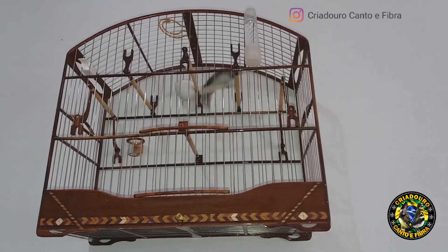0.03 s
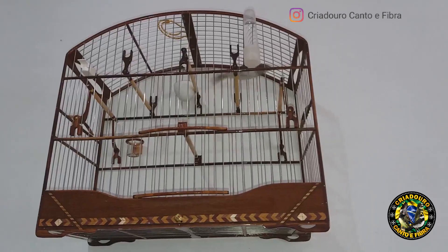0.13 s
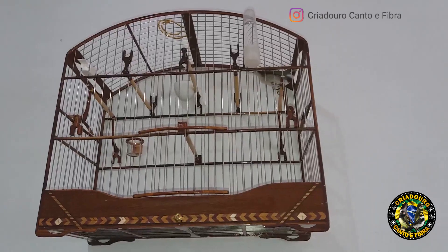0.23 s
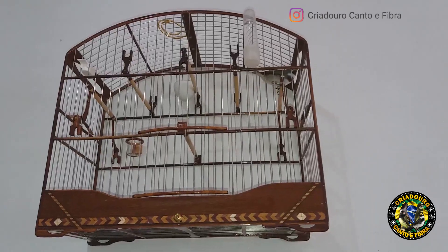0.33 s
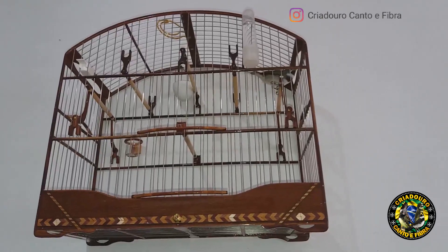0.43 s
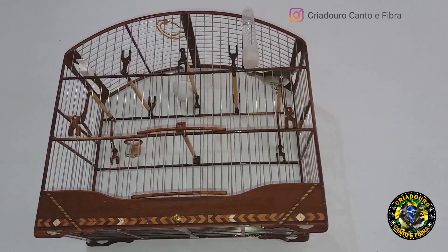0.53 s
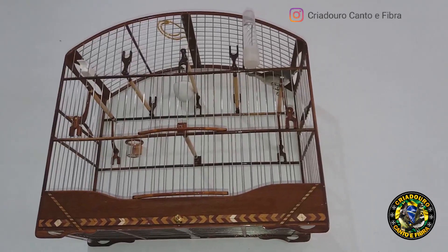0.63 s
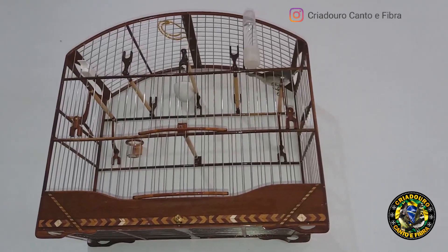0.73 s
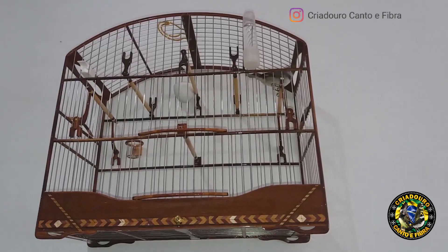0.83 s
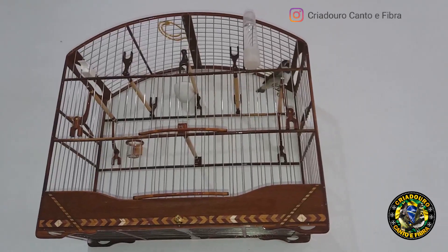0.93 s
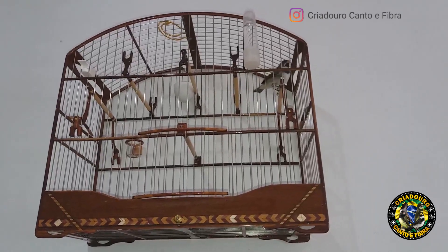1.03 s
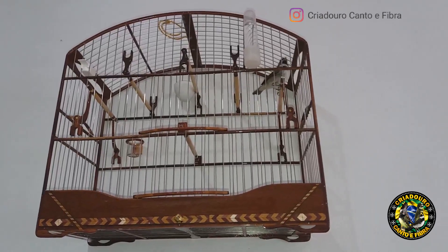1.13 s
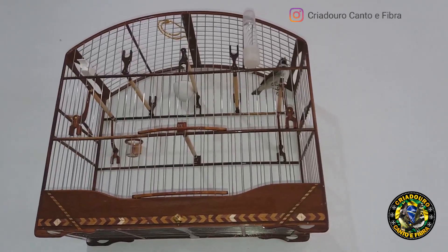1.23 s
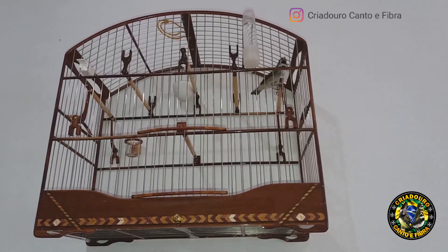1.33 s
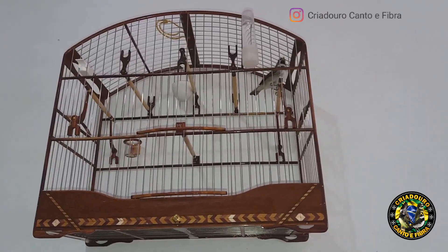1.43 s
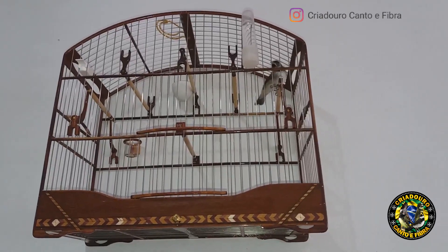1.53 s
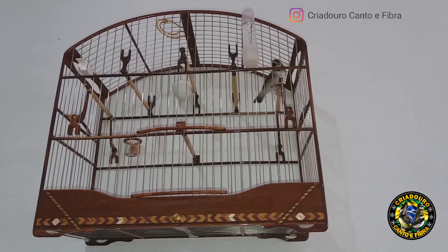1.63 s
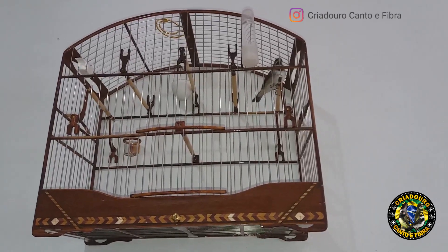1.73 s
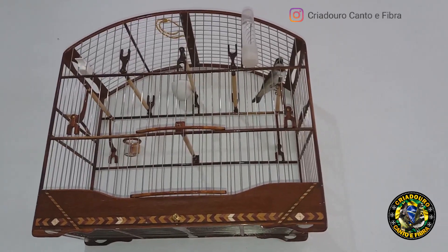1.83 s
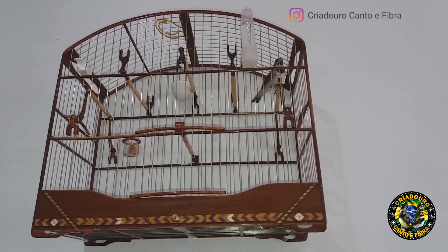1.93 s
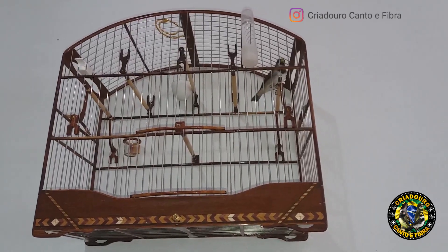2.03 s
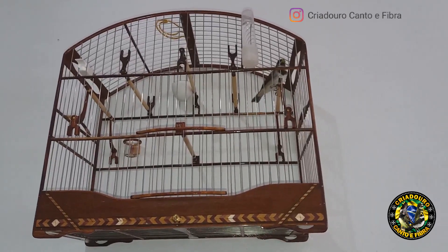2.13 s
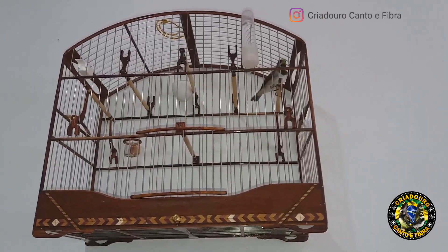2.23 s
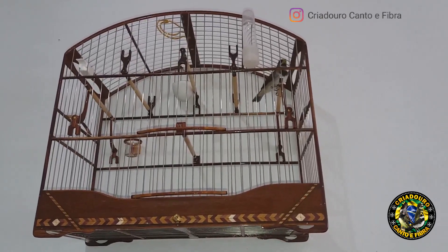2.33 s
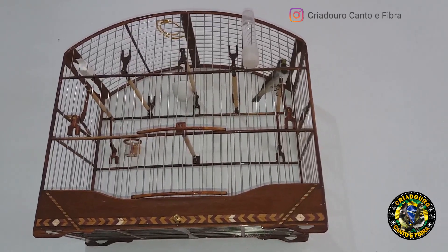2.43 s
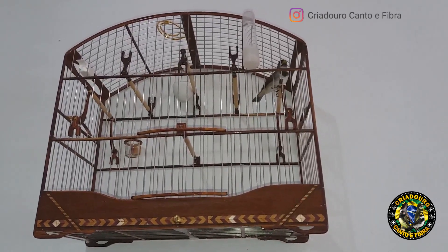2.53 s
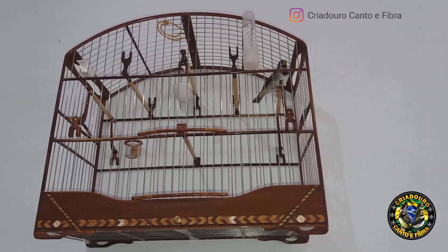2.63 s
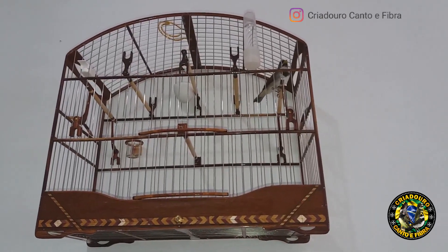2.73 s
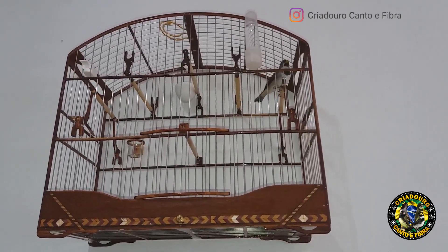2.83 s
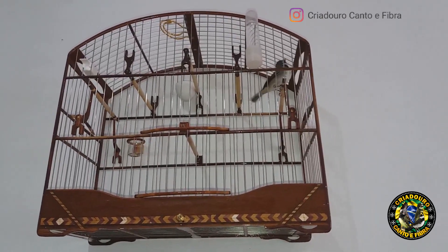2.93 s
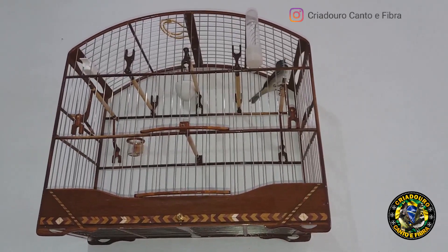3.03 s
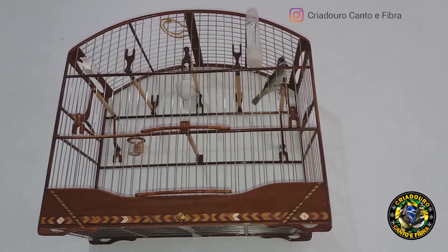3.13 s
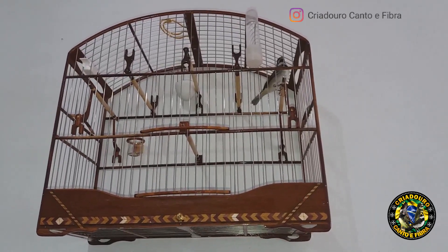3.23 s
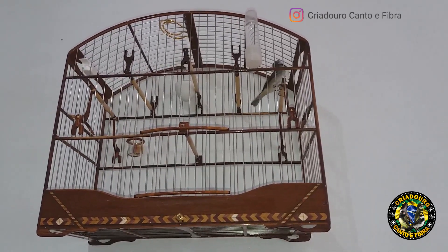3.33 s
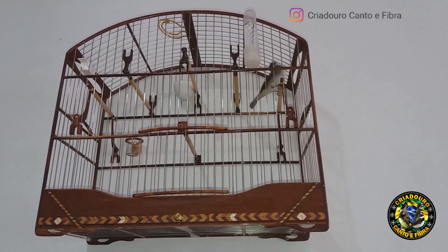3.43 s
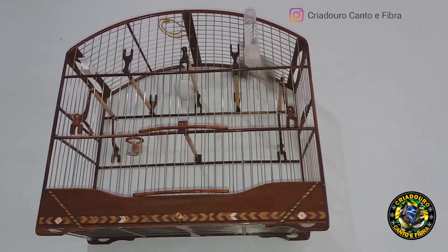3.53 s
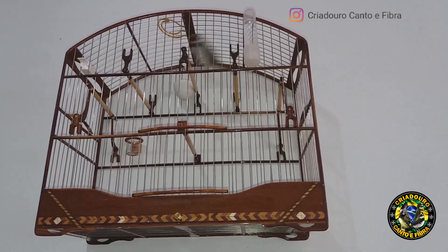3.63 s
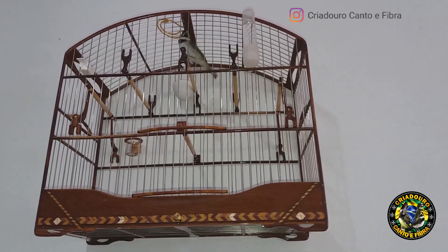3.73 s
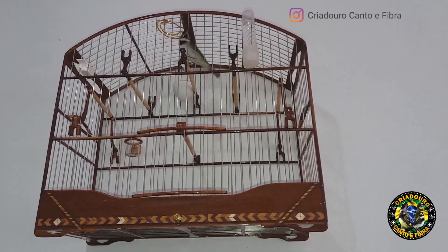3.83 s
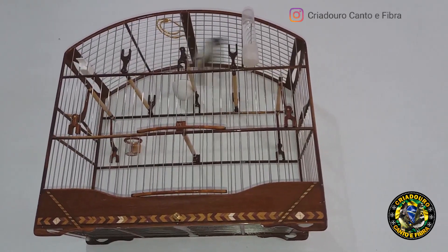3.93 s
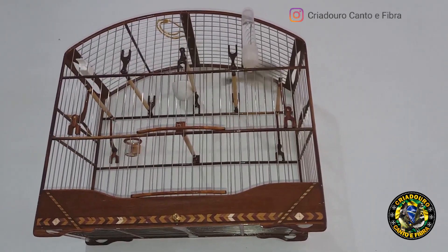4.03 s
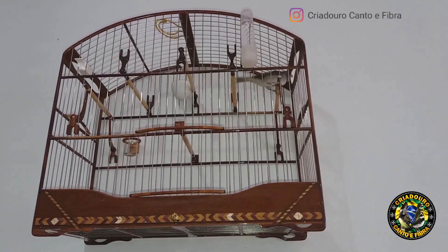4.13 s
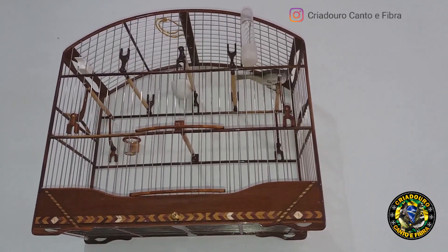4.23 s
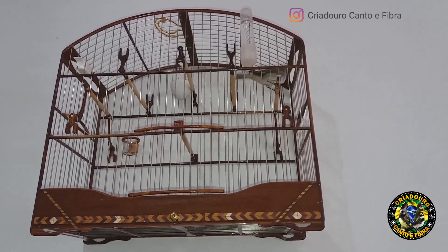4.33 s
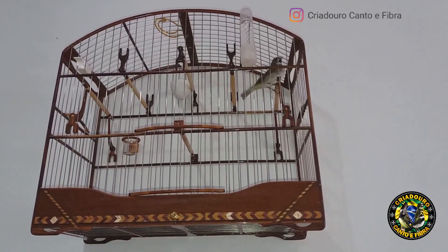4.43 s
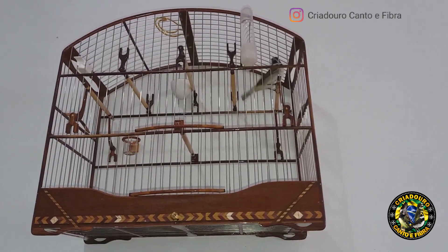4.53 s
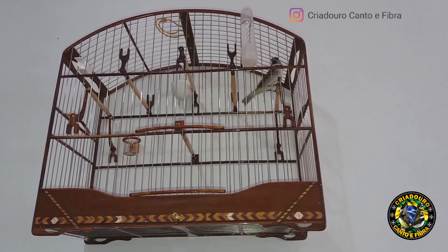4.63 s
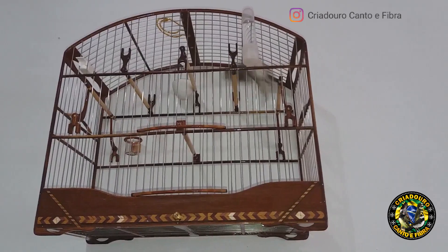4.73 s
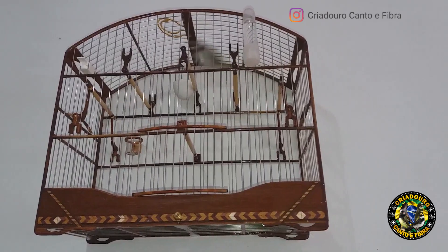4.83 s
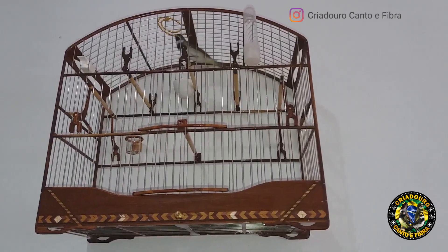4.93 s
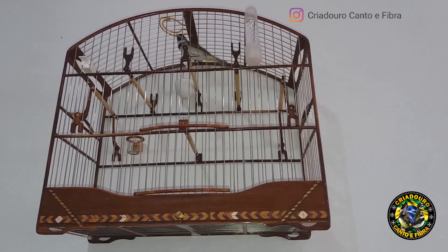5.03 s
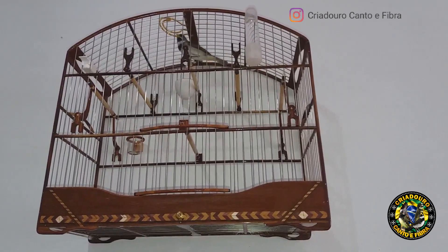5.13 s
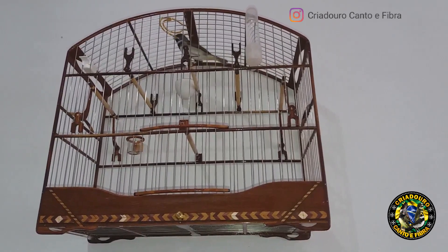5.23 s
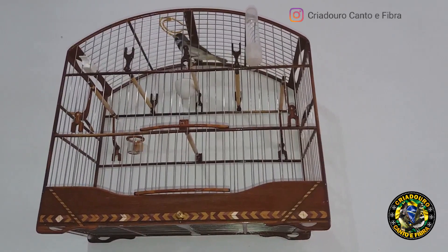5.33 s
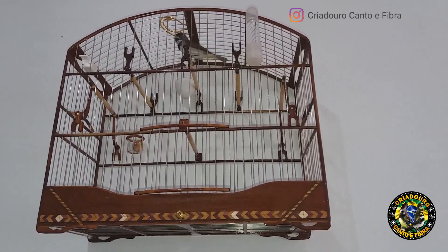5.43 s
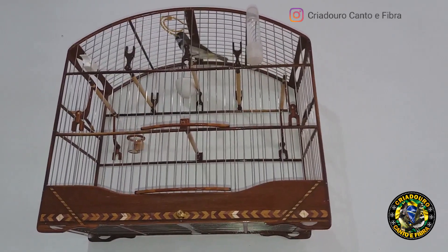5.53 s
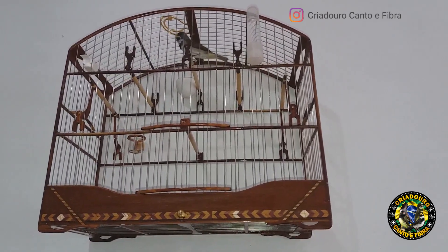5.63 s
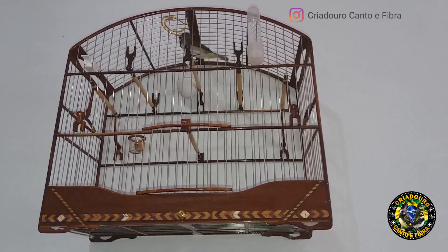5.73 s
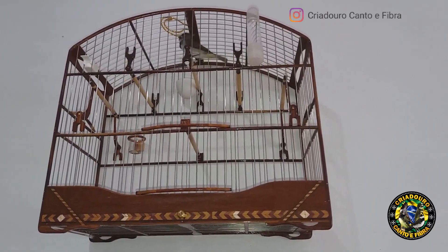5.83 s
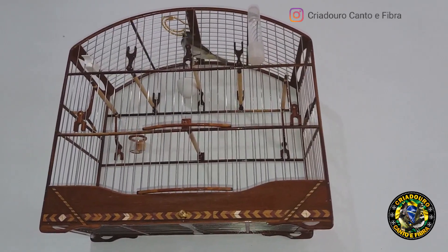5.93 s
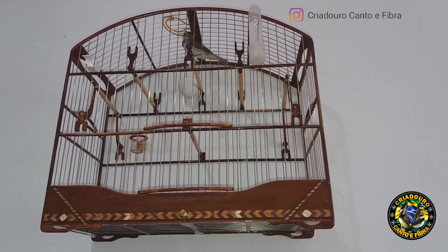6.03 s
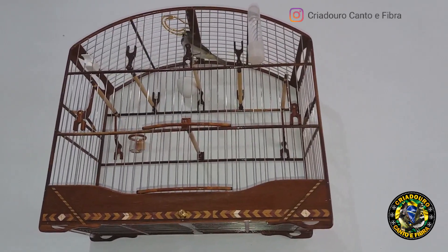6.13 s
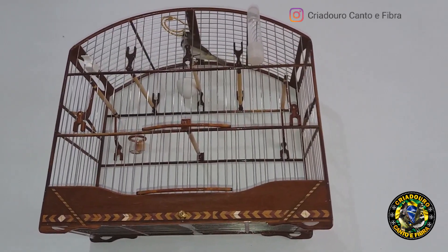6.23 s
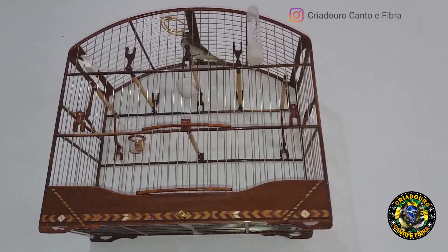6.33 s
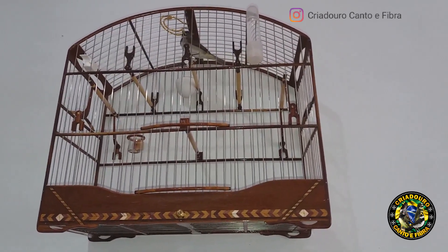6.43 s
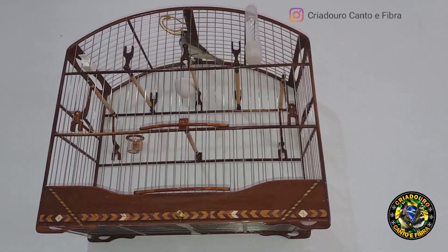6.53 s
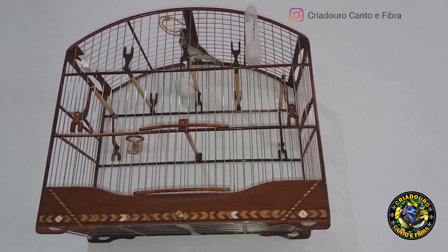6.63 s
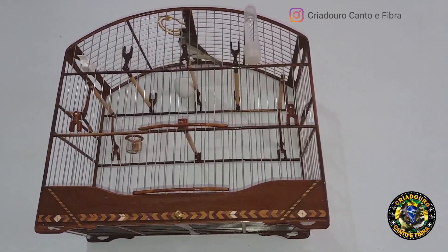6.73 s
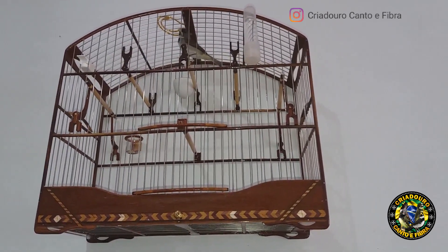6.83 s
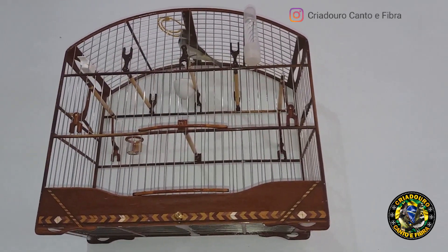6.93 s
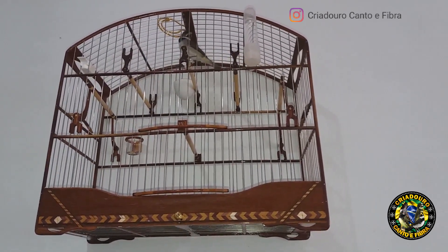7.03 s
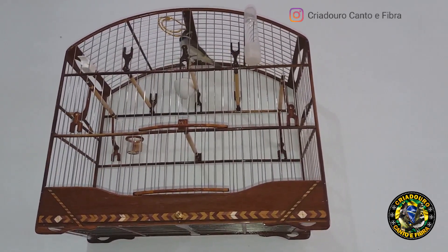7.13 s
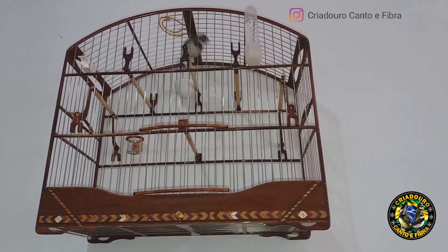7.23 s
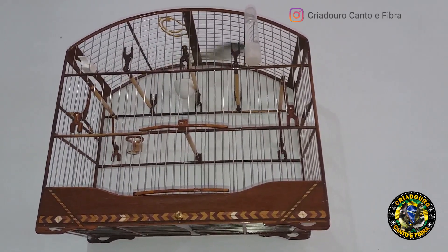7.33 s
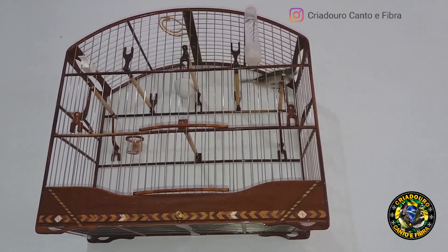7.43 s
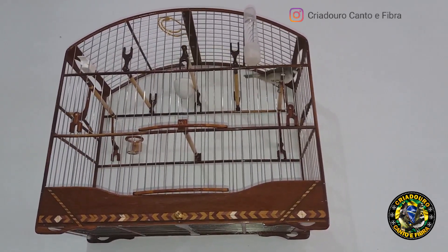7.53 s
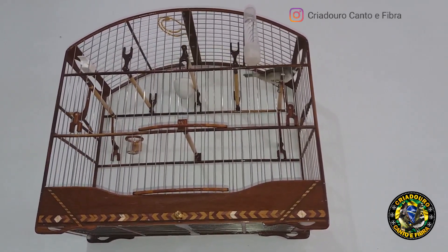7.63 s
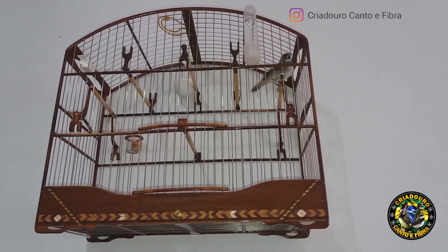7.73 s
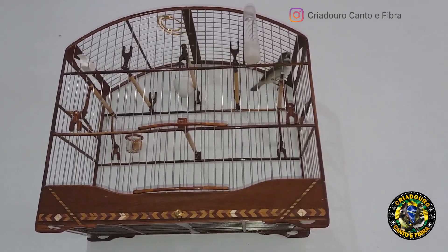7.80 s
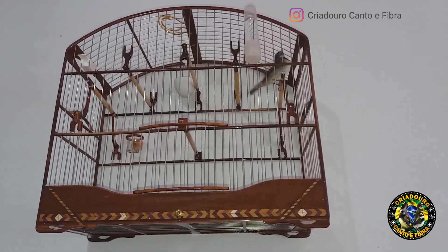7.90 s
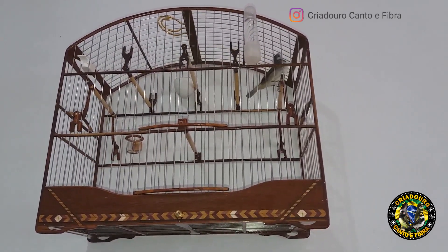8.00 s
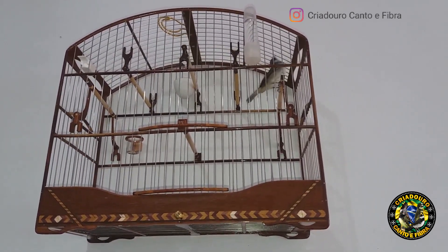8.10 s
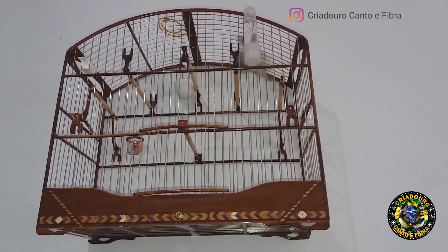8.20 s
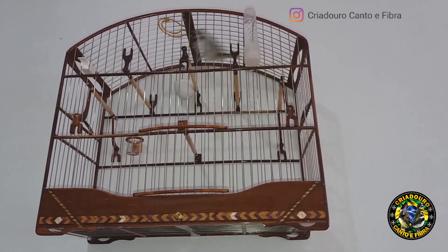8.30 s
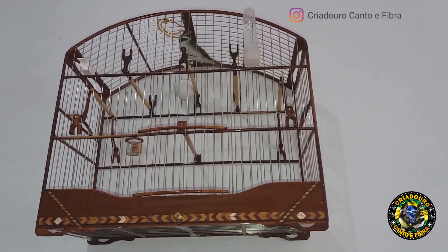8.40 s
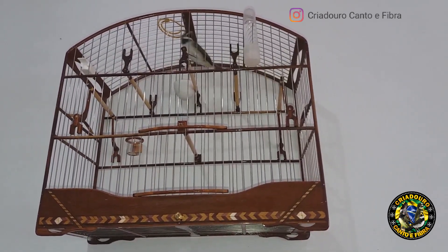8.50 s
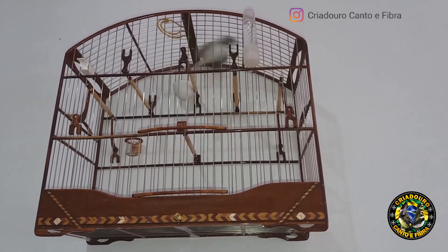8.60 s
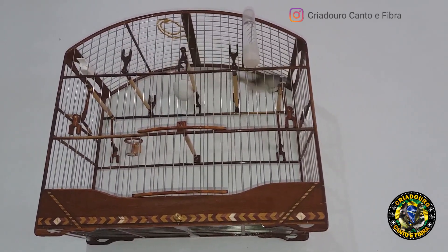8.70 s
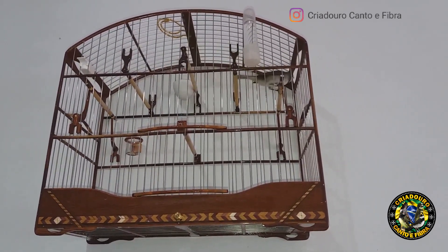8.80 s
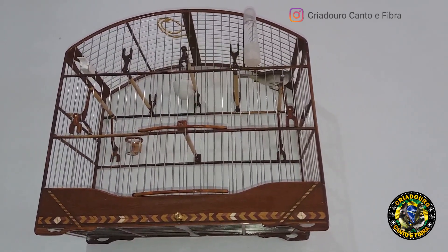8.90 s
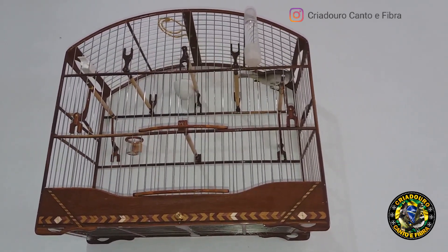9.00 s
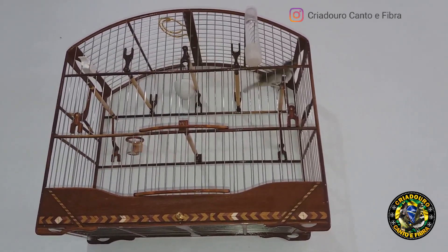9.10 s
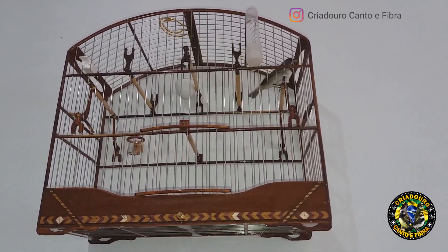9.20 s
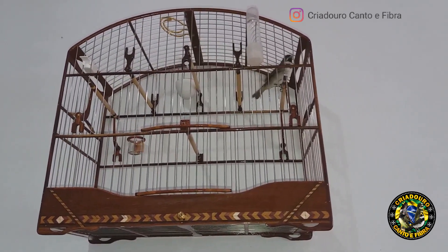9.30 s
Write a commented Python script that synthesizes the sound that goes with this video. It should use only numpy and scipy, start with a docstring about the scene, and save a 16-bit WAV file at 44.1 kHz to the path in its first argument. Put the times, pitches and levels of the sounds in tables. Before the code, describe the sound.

Over a quiet fan hum and airy hiss in a bare room, a nearby caged finch sings twice, each phrase about a second long: a thin whistle, two rising trills, then sharp downward sweeps carrying soft low pops. Before, between and after the songs come faint claw ticks and wooden perch knocks, occasionally with a thin wire ring. Distant birds give faint, hoarse chirps near the start and end.

```python
"""A bare, echoing room, the microphone near a small caged finch. The bird sings two phrases with its
syrinx: a whistle led in by a hiss of air, trilled rises, steep falls. Low pops ride on the falls.
Between songs it hops: claws tick, the wooden perch knocks, now and then a wire rings.
Other birds call faintly from further off, and a fan hums behind it all."""
import sys
import numpy as np
from scipy import signal
from scipy.fft import rfft, irfft
from scipy.io import wavfile
from scipy.ndimage import uniform_filter1d, minimum_filter1d

SR = 44100
rng = np.random.default_rng(int(sys.argv[2]) if len(sys.argv) > 2 else 0)


def unload_audio(sound):
    """Save the sound as a 16-bit wav file, at the path given as the first command line argument."""
    columns = np.transpose(np.atleast_2d(sound))
    # keep every value between -1 and 1, then stretch to whole-number steps
    steps = np.round(np.clip(columns, -1, 1) * 32767)
    wavfile.write(sys.argv[1], SR, steps.astype(np.int16))


N = 412776

# The notes of each syllable. Each row: note shape, offset in seconds, length in seconds,
# pitch as a multiple of the syllable's, level in dB against the syllable's.
SYLLABLE_NOTES = { "opening": [("whistle", 0, .073, 0.99, 0)], "slur": [("trill", -.06, .06, 0.74, -9),
                  ("rise", 0, .093, 1.0, 0)], "sweep": [("fall", 0, 0.06, 0.99, 0),
                  ("flick", .058, 0.014, 0.6643, 4.6), ("dip", .077, .053, .524, -6)], }
# The song, by syllable. Each row: time in seconds, pitch in Hz, level in dB,
# seconds by which the flick starts early, seconds by which it ends late.
SONG = { "opening": [(1.733, 4823, -3.5, 0, 0), (5.19, 4707, -6.5, 0, 0)],
        "slur": [(1.998, 4382, -3.5, 0, 0), (2.215, 4287, -3.5, 0, 0), (5.448, 4413, -4.5, 0, 0),
        (5.68, 4237, -2.5, 0, 0), (5.905, 4285, -4, 0, 0)], "sweep": [(2.36, 7340, -7, 0.0027, 0.0013),
        (2.53, 7336, -8, 0.001, 0.0055), (2.722, 7350, -9, 0.0013, 0.0011), (6.039, 7346, -6, .002, 0.011),
        (6.211, 7214, -5.5, 0.0071, 0.00084)], }


def finch_song():
    """The finch, near the microphone, strings notes into syllables; a hiss leads into each phrase."""
    out = np.zeros(N)
    for syllable, rows in SONG.items():
        for s, hz, db, early_s, late_s in rows:
            if syllable == "opening":
                add(out, s + .01 - BREATH_S, breath(db))
            for kind, offset_s, length, pitch, note_db in SYLLABLE_NOTES[syllable]:
                if kind == "flick":
                    offset_s, length = offset_s - early_s, length + early_s + late_s
                add(out, s + offset_s, note(kind, length, hz * pitch, db + note_db))
    return out


# The course of each kind of note. Each row: share of its length from 0 to 1,
# pitch as a multiple of the note's, level in dB against the note's.
NOTE_SHAPES = { "whistle": [(0, .84, -34.5), (.15, .92, -18.5), (.4, .975, -9), (.65, 1.0, 3.5),
               (.88, 1.0, -2), (1, .95, -24.5)], "trill": [(0, .86, -21), (.2, .93, -11), (.5, .96, -4.5),
               (.8, .99, -4.5), (1, 1.03, -3.5)], "rise": [(0, .81, -13), (.2, .85, -6), (.4, .935, -1.5),
               (.6, .98, -4), (.85, 1.0, 0.5), (1, 1.0, -9)], "fall": [(0, 1.01, -24), (.15, .97, -3),
               (.36, .9, 2.5), (.55, .8, -3.5), (.75, .74, -6.5), (.9, .72, -8.5), (1, .705, -14.5)],
               "flick": [(0, .86, -11), (.3, .94, -8), (.65, .99, 0), (1, 1.0, -5)], "dip": [(0, .93, -8),
               (.17, 1.0, 1.5), (.4, .89, -2.5), (.62, .76, -7.5), (.85, .72, -11), (1, .69, -18)], }
# Unsteadiness within a note. Each entry: kind of note, rms waver of its level in dB.
LEVEL_WAVER_DB = {"whistle": .3, "trill": 2.8, "rise": 2.5, "fall": 3.5, "flick": 1.0, "dip": 3.0}
TRILL_HZ, TRILL_SWING, TRILL_JITTER = 160.4, 0.1, .2  # pulse rate, share of the pitch, rms cycles


def note(kind, length, hz, db):
    """One gliding note; in a trill the valve opens in uneven pulses and the pitch swings with it."""
    at, pitch, shape_db = np.transpose(NOTE_SHAPES[kind])
    share = np.linspace(0, 1, int(length * SR))
    valve = undb(LEVEL_WAVER_DB[kind] * smooth_noise(len(share), 160))
    glide = hz * uniform_filter1d(np.interp(share, at, pitch), size=100, mode="nearest")
    if kind == "trill":
        jitter = TRILL_JITTER * smooth_noise(len(share), 60)
        beat = 2 * np.pi * (TRILL_HZ * length * (share - 1) + jitter)
        glide = glide * (1 - TRILL_SWING * np.cos(beat - .5))  # highest near the widest opening
        valve = valve * (0.56 + (.5 - .5 * np.cos(beat)) ** 4.2)
    gain = undb(db + np.interp(share, at, shape_db))
    return syrinx(glide, gain, kind, valve)


# Overtones, by kind of note. Each row: levels of the second, third and fourth harmonics in dB.
OVERTONES_DB = {"whistle": (-41, -44.5, -71), "trill": (-18, -32, -32), "rise": (-40, -36.5, -44.5),
                "fall": (-25, -56, -60), "flick": (-31.5, -27.5, -54.5), "dip": (-33, -39, -32.5)}
# Roughness of the overtones. Each entry: kind of note, share of turbulence from 0 to 1.
TURBULENCE = {"whistle": .08, "trill": .5, "rise": .2, "fall": .6, "flick": .6, "dip": .7}
RASP_HZ, PITCH_WOBBLE = 500, .0025  # top rate of the flutter, share of the pitch


def syrinx(hz, gain, kind, valve=1):
    """A bird's voice: a slightly unsteady sine, faint overtones that turbulence smears, soft ends."""
    count, rasp = len(hz), TURBULENCE[kind]
    unsteady_hz = hz * (1 + PITCH_WOBBLE * smooth_noise(count, 91))
    phase = 2 * np.pi * np.cumsum(unsteady_hz) / SR
    wave = valve * np.sin(phase)
    for k, db in zip((2, 3, 4), OVERTONES_DB[kind]):
        flutter = 1 - rasp + rasp * smooth_noise(count, RASP_HZ)
        in_band = k * hz < .45 * SR
        wave += undb(db) * in_band * valve ** 0.095 * flutter * np.sin(k * phase)
    n = np.arange(count)
    fade = np.clip(np.minimum(n, n[::-1]) / (.003 * SR), 0, 1)  # 3 ms at each end
    return wave * gain * fade


BREATH_S, BREATH_HZ, BREATH_WIDTH_HZ = .045, 4815, 3200


def breath(syllable_db):
    """Air escapes before the voice sets in, swelling towards the note."""
    hiss = resonance(rng.standard_normal(int(BREATH_S * SR)), BREATH_HZ, BREATH_WIDTH_HZ)
    return undb(syllable_db - 48) * unit(hiss) * np.linspace(0, 1, len(hiss))


# Pops on the steep falls. Each row: start in seconds, crackle level in dB, thump level in dB.
LOW_POPS = [(2.379, -22, -32), (2.385, -29, -44), (2.428, -29.5, -23), (2.559, -29, -21.5),
            (2.574, -33.5, -36), (2.58, -31.5, -44), (2.741, -35, -42.5), (2.752, -30.5, -45.5),
            (2.761, -35.5, -43), (2.792, -34.5, -39), (6.059, -25.5, -20), (6.069, -27.5, -18.5),
            (6.229, -26.5, -22)]


def pops(crackle_rise_s=.001, thump_rise_s=.00078, cutoff_hz=1090):
    """Short, dull crackles over a soft thump, with none of the room's echo on them."""
    out, t = np.zeros(N), np.arange(SR // 20) / SR
    lowpass = signal.butter(2, cutoff_hz, fs=SR)
    thump = t / thump_rise_s * np.exp(1 - t / thump_rise_s)
    burst = t / crackle_rise_s * np.exp(1 - t / crackle_rise_s)
    for s, crackle_db, thump_db in LOW_POPS:
        crackle = burst * unit(signal.lfilter(*lowpass, rng.standard_normal(len(t))))
        add(out, s, undb(crackle_db) * crackle + undb(thump_db) * thump)
    return out


# The wooden perch's modes. Each row: frequency in Hz, relative level in dB, seconds to fall 60 dB.
PERCH_MODES = [(2375, 1.5, 0.035), (3320, 0.5, .02), (5054, -2.5, 0.013)]
# Feet landing on perch and wires. Each row: start in seconds, tick level in dB, tap level in dB.
LANDINGS = [(0.0437, -56, -59), (0.2971, -62, -51), (3.624, -63, -66), (3.7317, -63, -52),
            (3.9572, -65, -66), (4.0455, -61, -64), (4.143, -61, -45), (4.831, -55, -54),
            (4.938, -58, -59.5), (7.2983, -60.5, -56), (7.5058, -57, -40.5), (8.2748, -66, -56),
            (8.604, -62, -46), (8.6893, -58, -56), (8.7892, -50, -42)]
# A cage wire is plucked. Each row: start in seconds, level in dB.
WIRE_PLUCKS = [(3.7317, -56), (4.0455, -54), (4.938, -59)]


def hops(tick_s=.004, wire_hz=6430, wire_t60_s=.06):
    """In the cage, close by: claws scratch, the perch knocks, now and then a wire rings thinly."""
    out, t = np.zeros(N), np.arange(SR // 5) / SR
    tap = sum(undb(db) * np.sin(2 * np.pi * hz * t) * decay(t, t60) for hz, db, t60 in PERCH_MODES)
    for s, tick_db, tap_db in LANDINGS:
        tick = np.diff(rng.standard_normal(len(t) + 1)) * np.exp(-t / tick_s)
        add(out, s, undb(tick_db) * tick + undb(tap_db) * tap)
    ring = np.sin(2 * np.pi * wire_hz * t) * decay(t, wire_t60_s)
    for s, db in WIRE_PLUCKS:
        add(out, s, undb(db) * ring)
    return out


# Calls from further off. Each row: start in seconds, length in seconds, first pitch in Hz,
# last pitch in Hz, relative level in dB, hoarseness from 0 to 1.
FAR_CALLS = [(0.765, 0.062, 4506, 3980, -48, 1), (0.792, 0.055, 3813, 3000, -47, .9),
             (7.933, 0.064, 3970, 3550, -58, 0.43), (8.24, 0.053, 3200, 3035, -55, 0.53),
             (8.313, 0.086, 3797, 3762, -54.5, .3), (8.475, 0.06, 6550, 5720, -51.5, 0.86),
             (8.556, 0.0295, 4260, 4094, -53, .4), (8.578, 0.07, 3570, 3020, -53, .6),
             (8.731, 0.07, 7140, 4230, -48, .8)]


def far_birds():
    """Birds outside, well away from the microphone, give short, hoarse downward glides."""
    out = np.zeros(N)
    for s, length, first_hz, last_hz, db, hoarse in FAR_CALLS:
        count = int(length * SR)
        flutter = 1 + hoarse * smooth_noise(count, RASP_HZ)
        gain = undb(db) * np.hanning(count) ** 0.155 * flutter
        add(out, s, syrinx(np.geomspace(first_hz, last_hz, count), gain, "whistle"))
    return out


# Echoes off cage floor, wall behind and ceiling. Each row: delay in seconds, signed share of the sound.
FIRST_ECHOES = [(.0023, -.2), (.0061, .15), (.0145, .25)]


def direct_path(x, beam_hz=3500):
    """Cage to microphone, with the first hard echoes; the beak aims only the sound above beam_hz."""
    out = butterworth(x, 2, beam_hz, "high")
    for delay_s, share in FIRST_ECHOES:
        add(out, delay_s, share * x)
    return out


def room(x, t60_s=.59, treble_t60_s=.37, gap_s=.004):
    """Dense echoes of bare walls; they build up after a gap and the treble dies first."""
    t = np.arange(SR) / SR
    noise = rng.standard_normal(SR)
    low = butterworth(noise, 4, 9500)
    treble = undb(2) * (noise - low)
    tail = low * decay(t, t60_s) + treble * decay(t, treble_t60_s)
    tail *= np.clip(t / gap_s - 1, 0, 1)
    return signal.fftconvolve(x, tail / np.sqrt(np.sum(tail ** 2)))[:N]


# The spectrum of the room's air. Each row: frequency in Hz, relative density in dB.
AIR_SPECTRUM = [(18, -63), (30, -32.5), (92, -1.5), (178, -12.5), (231, -11.5), (292, -15), (400, -6),
                (608, -13.5), (832, -19.5), (900, -16.5), (1690, -23.5), (3000, -36.5), (4330, -33.5),
                (8550, -52), (15600, -53)]
# Fan hum and the room resonances it stirs. Each row: centre in Hz, width in Hz, relative level in dB.
HUM_BANDS = [(105.9, 17, -6.5), (226.4, 27, -10.5), (320.5, 15, -15.5), (408, 4, -6.5), (507.3, 28, -9.5),
             (571, 10, -22), (665, 12, -19), (744, 19, -17.5), (816, 2.6, -16.5), (845, 6, -19),
             (1688, 46, -21), (3480, 60, -30.5), (4280, 42, -29), (2060, 880, -15), (6940, 1700, -31.5)]
# The room tone sags after each song and creeps back. Each row: time in seconds, gain in dB.
ROOM_TONE_GAIN = [(0.0, -39.5), (0.34, -40.5), (1.69, -40), (2.92, -47), (3.91, -47), (4.3, -41.5),
                  (5.16, -40), (6.13, -43), (6.59, -39.5), (6.88, -44), (8.11, -40), (9.36, -40)]


def fan_and_air():
    """Room tone behind the birds: broad air noise and the wavering hum of a fan."""
    air_hz, air_db = np.transpose(AIR_SPECTRUM)
    out = undb(-1) * coloured_noise(lambda hz: undb(np.interp(np.log(hz), np.log(air_hz), air_db)))
    for centre_hz, width_hz, db in HUM_BANDS:
        out += undb(db) * coloured_noise(lambda hz: 1 / (1 + (2 * (hz - centre_hz) / width_hz) ** 2))
    s, gain_db = np.transpose(ROOM_TONE_GAIN)
    return out * undb(np.interp(np.arange(N) / SR, s, gain_db))


def undb(db):
    return 10 ** (np.asarray(db) / 20)


def unit(x):
    return x / np.sqrt(np.mean(x ** 2))


def decay(t, t60_s):
    return np.exp(-np.log(1000) * t / t60_s)


def add(track, s, x):
    i = int(s * SR)
    track[i:i + len(x)] += x[:N - i]


def butterworth(x, order, hz, kind="low"):
    return signal.sosfilt(signal.butter(order, hz, kind, fs=SR, output="sos"), x)


def resonance(x, hz, width_hz):
    return signal.lfilter(*signal.iirpeak(hz, hz / width_hz, fs=SR), x)


def smooth_noise(count, hz):
    """Noise below hz, rms 1."""
    return unit(butterworth(rng.standard_normal(count + 2000), 3, hz)[2000:])


def coloured_noise(gain):
    """Noise of rms 1 whose spectrum is gain(Hz)."""
    hz = np.maximum(np.arange(N // 2 + 1) * SR / N, 1)
    return unit(irfft(rfft(rng.standard_normal(N)) * gain(hz), N))


# The microphone's housing gives a dip above the song's range and a lift near the top.
# Each row: centre in Hz, width in Hz, signed share of that band added.
HOUSING_BANDS = [(7896, 1500, -0.5), (10200, 1700, -0.35), (13000, 4500, 0.8)]


def scene():
    """At one microphone: the cage near, other birds far, the room around, all coloured by the housing."""
    near, far = finch_song() + hops(), far_birds()
    heard = direct_path(near) + 0.5 * far + room(undb(-3) * near + far) + fan_and_air()
    for hz, width_hz, share in HOUSING_BANDS:
        heard += share * resonance(heard, hz, width_hz)
    return (heard + pops())[None]


def record(dry):
    """The capsule drops the deepest bass, a quick limiter holds the loudest peaks, and the top is cut."""
    ceiling, window, top_hz = .89, 89, 15757  # the window is in samples, about 2 ms
    dry = butterworth(dry, 3, 50, "high")
    peak = -minimum_filter1d(-np.abs(dry), window)
    gain = np.minimum(1, ceiling / (peak + 1e-9))
    gain = uniform_filter1d(minimum_filter1d(gain, window), window)
    return signal.sosfilt(signal.ellip(12, .5, 70, top_hz, fs=SR, output="sos"), dry * gain)


dry = scene()
out = record(dry)
unload_audio(out)
```